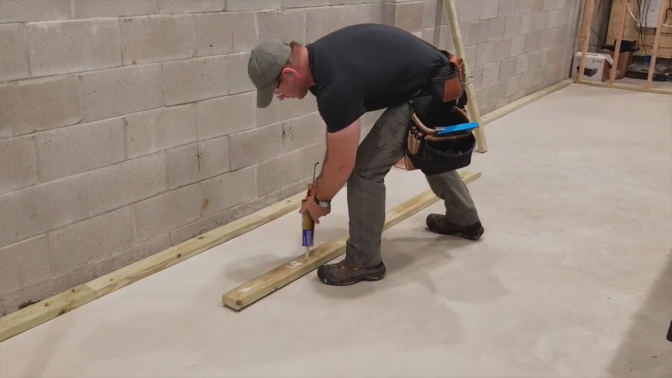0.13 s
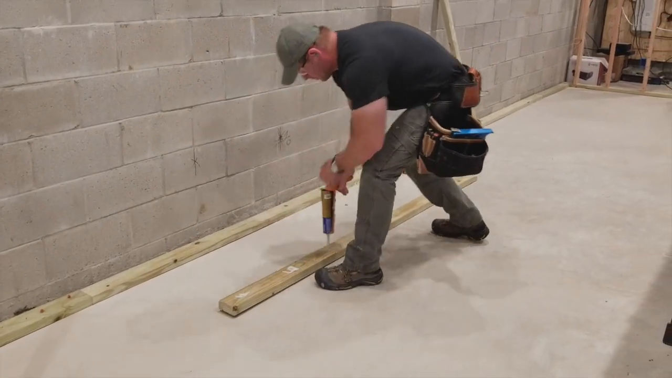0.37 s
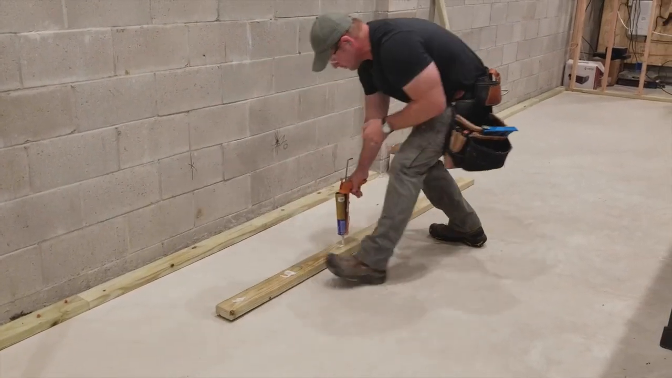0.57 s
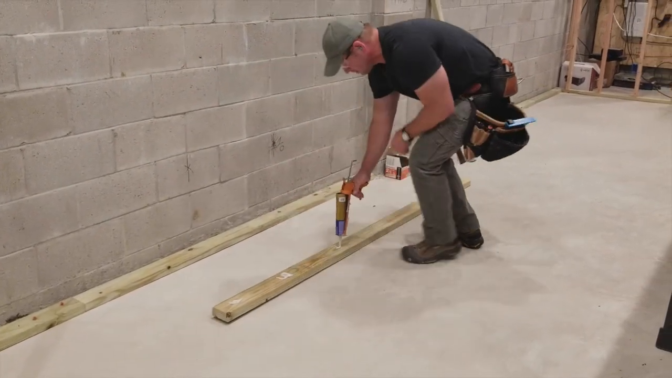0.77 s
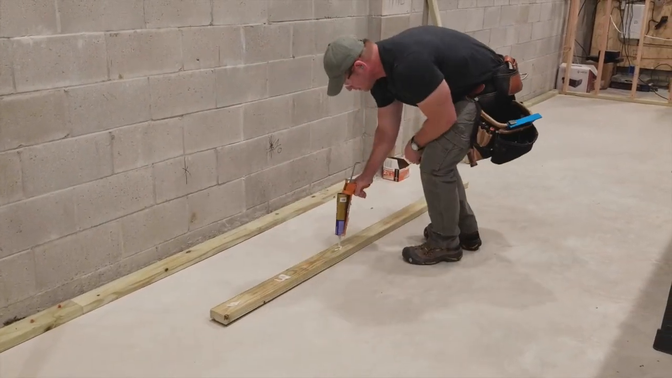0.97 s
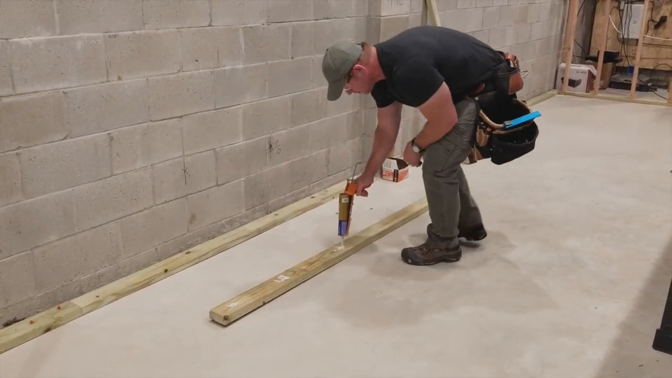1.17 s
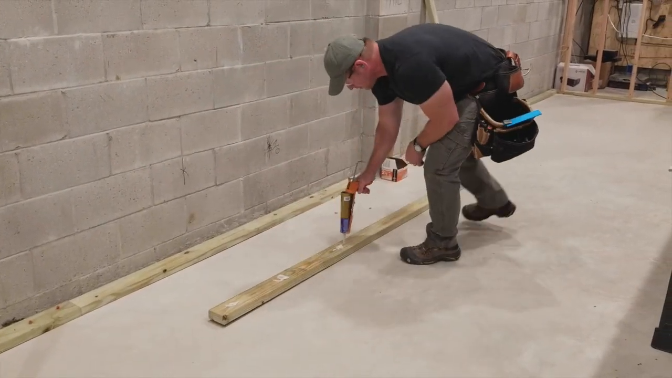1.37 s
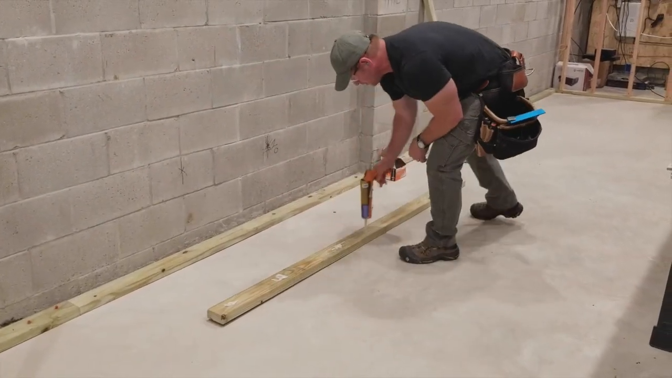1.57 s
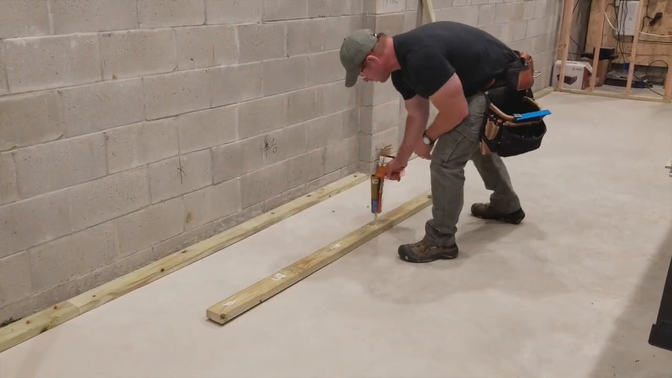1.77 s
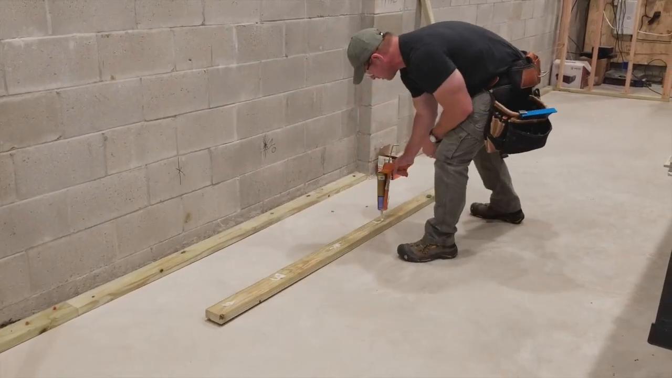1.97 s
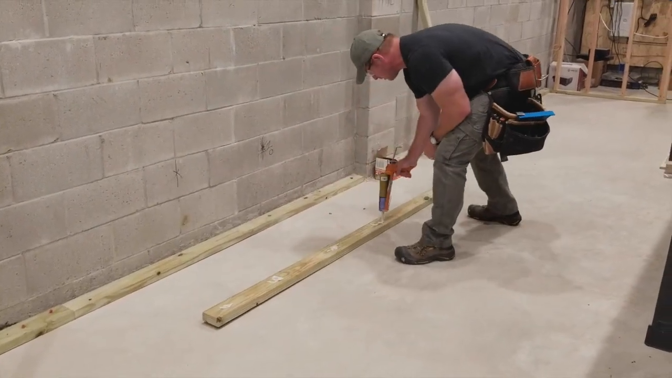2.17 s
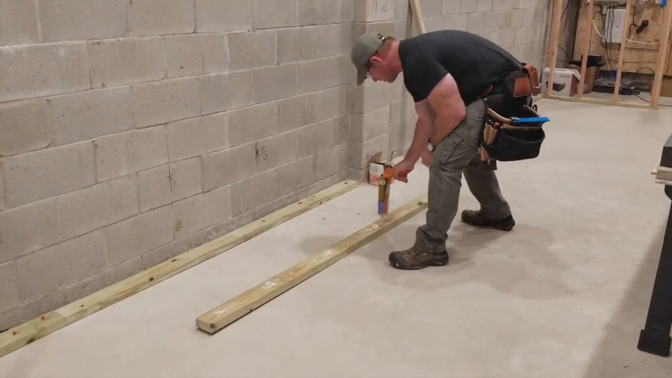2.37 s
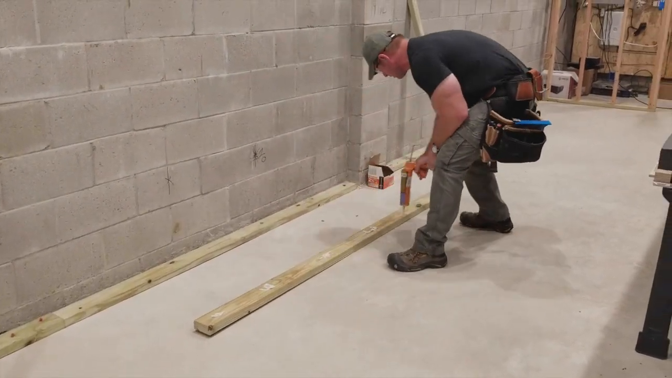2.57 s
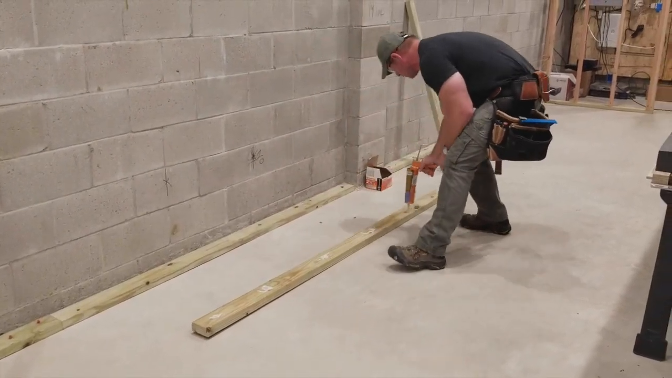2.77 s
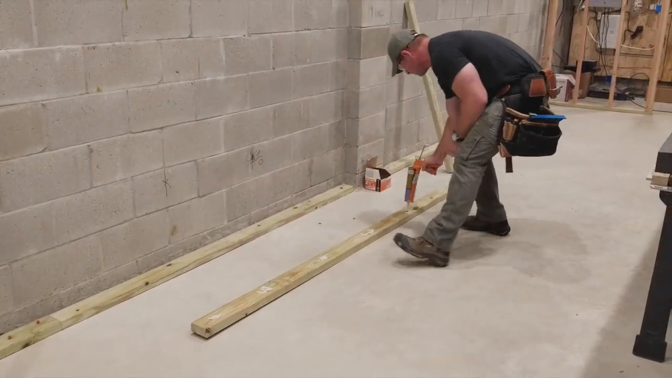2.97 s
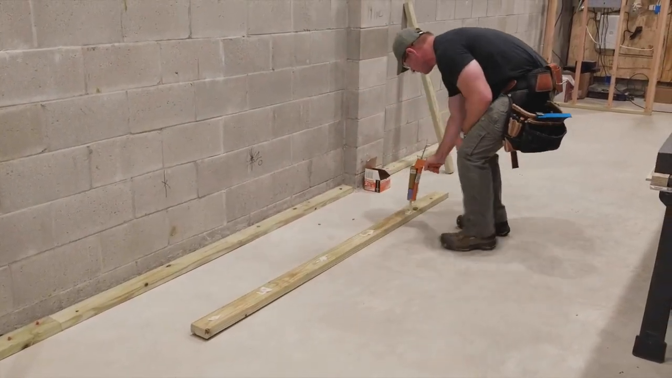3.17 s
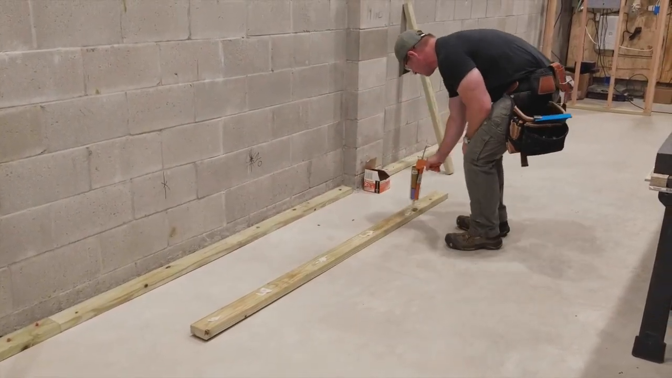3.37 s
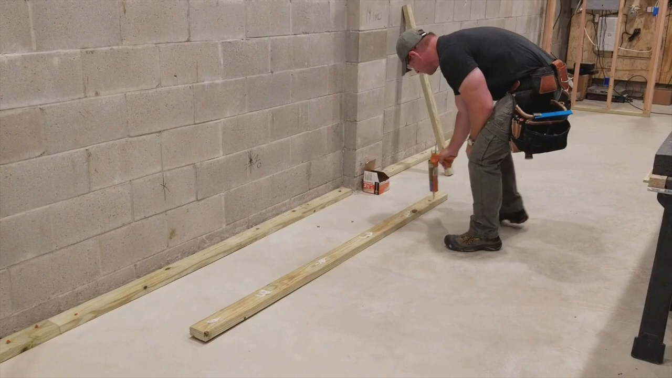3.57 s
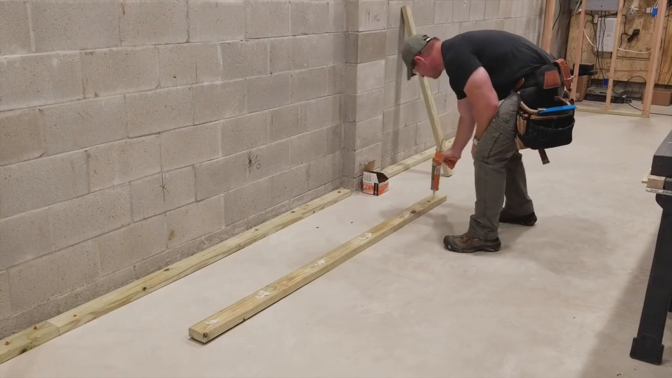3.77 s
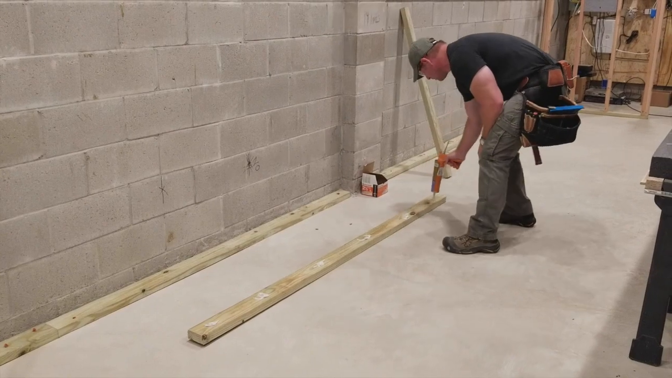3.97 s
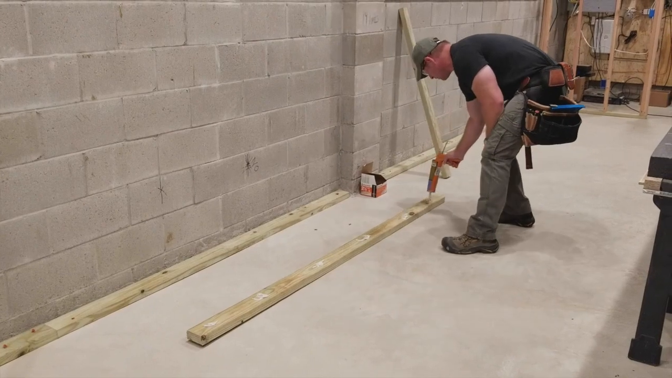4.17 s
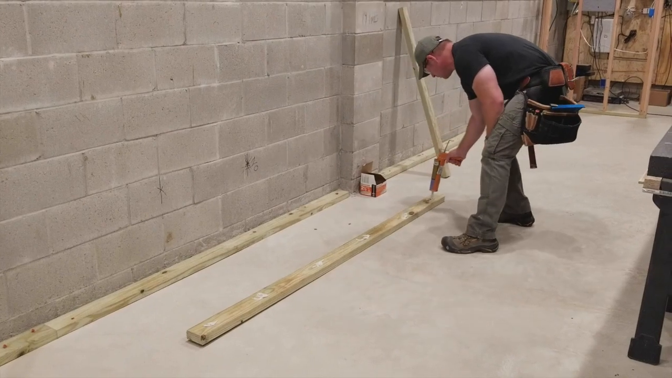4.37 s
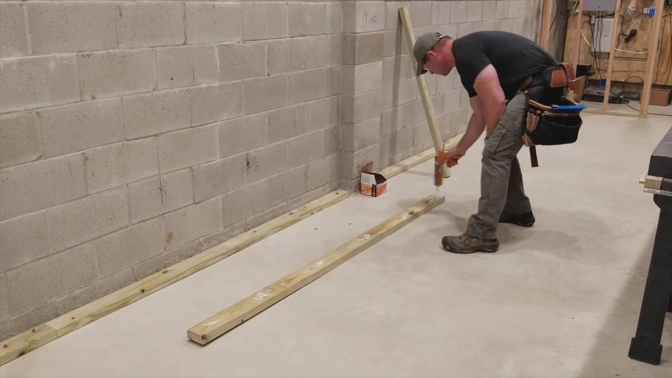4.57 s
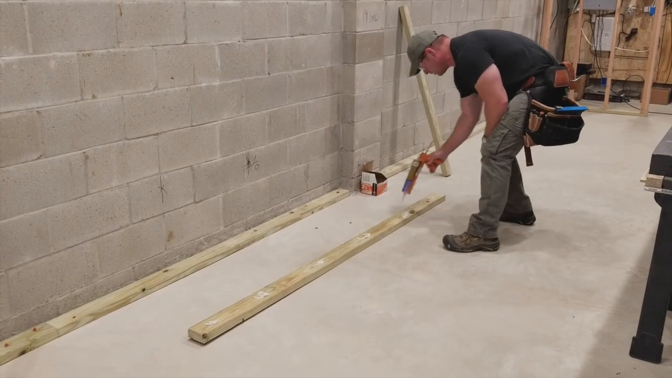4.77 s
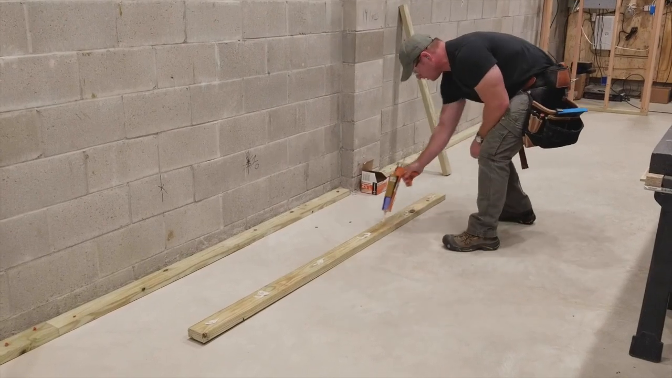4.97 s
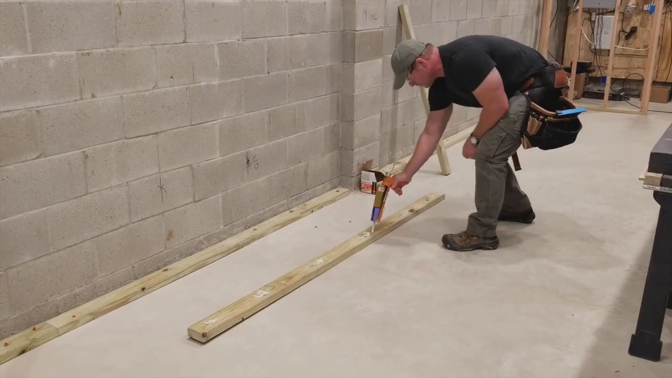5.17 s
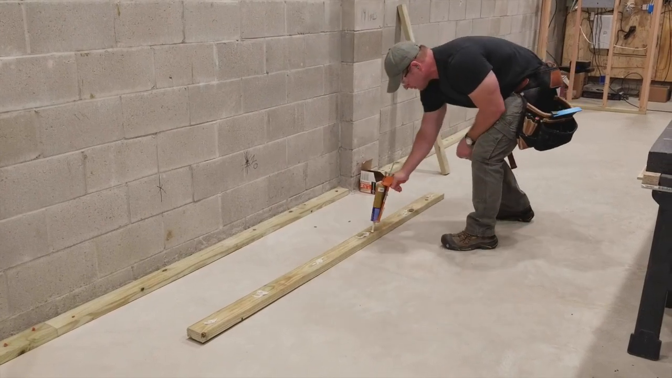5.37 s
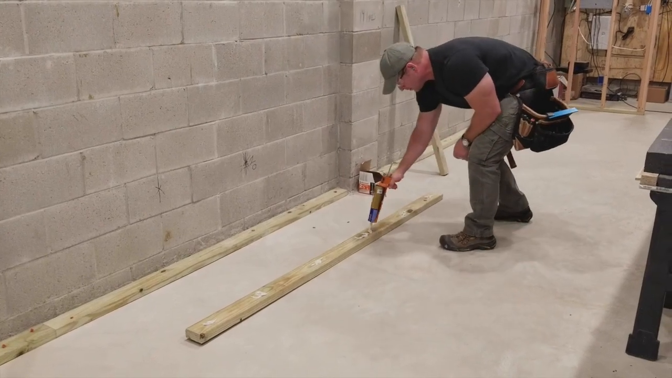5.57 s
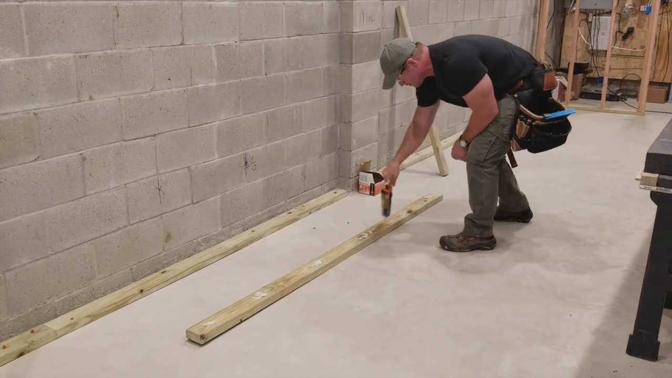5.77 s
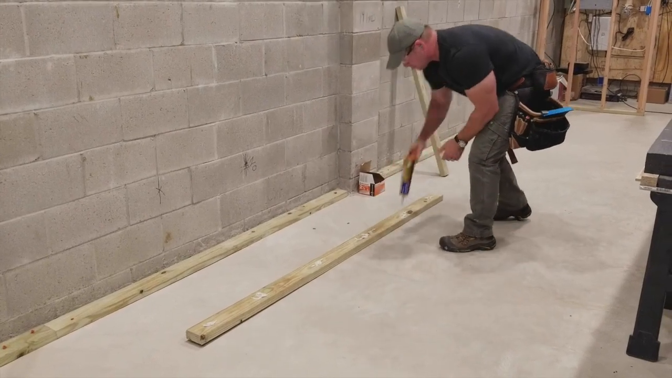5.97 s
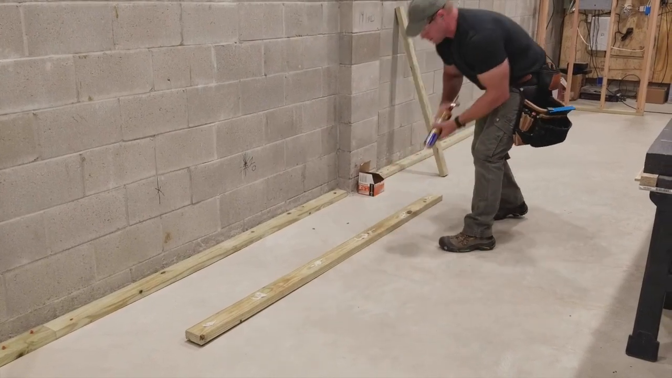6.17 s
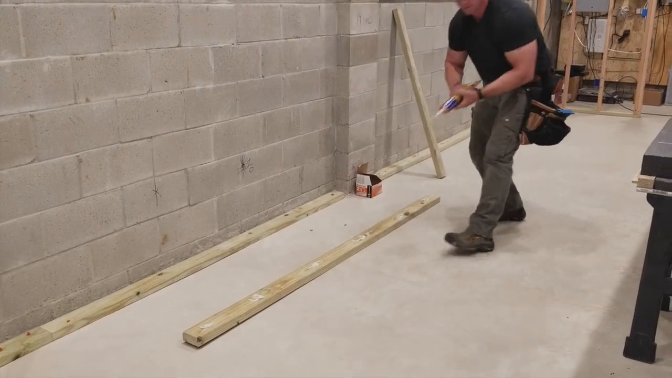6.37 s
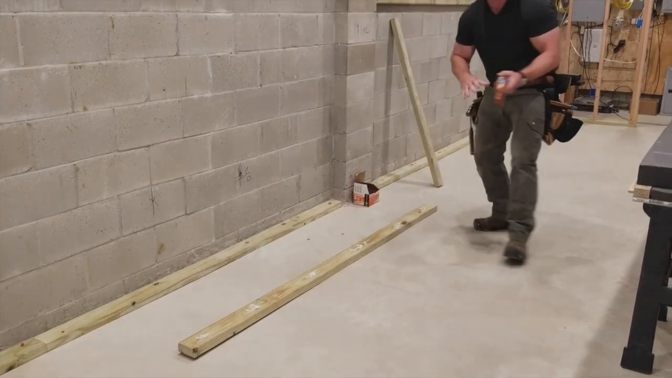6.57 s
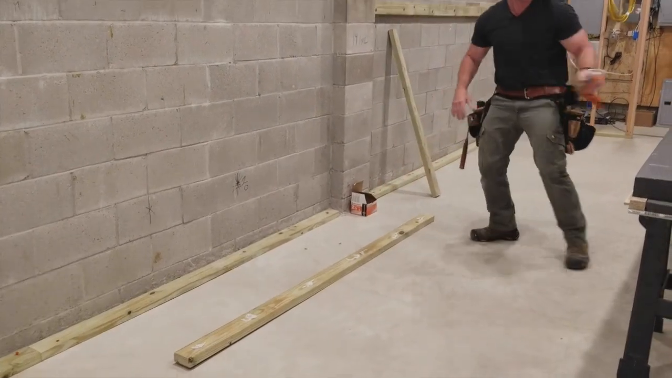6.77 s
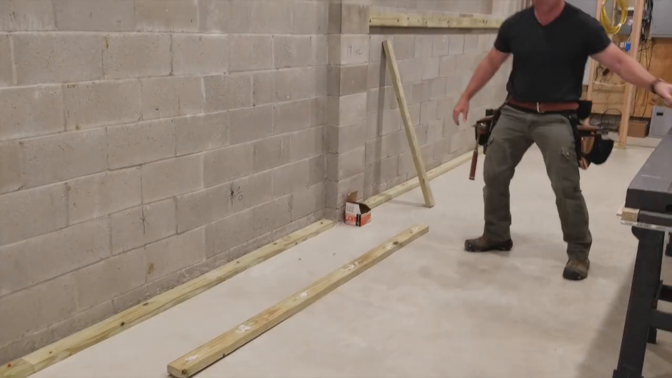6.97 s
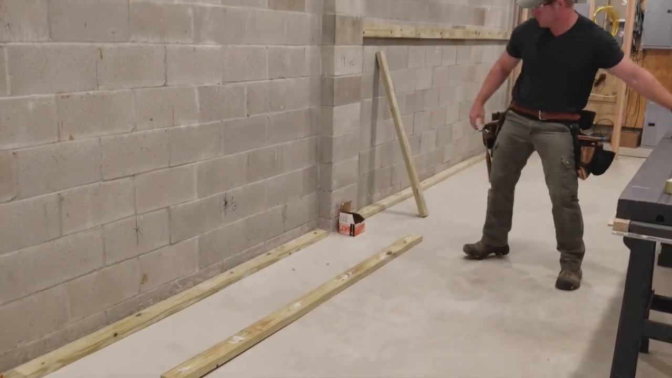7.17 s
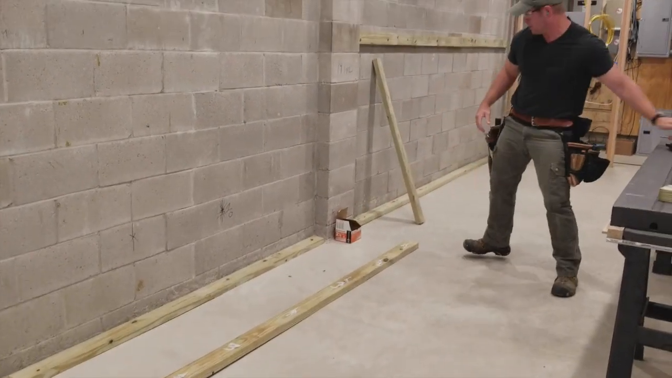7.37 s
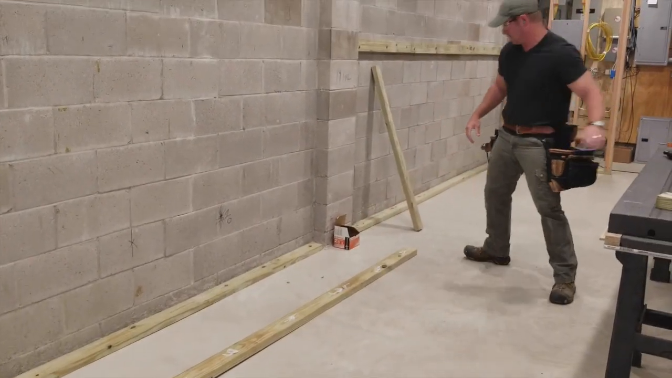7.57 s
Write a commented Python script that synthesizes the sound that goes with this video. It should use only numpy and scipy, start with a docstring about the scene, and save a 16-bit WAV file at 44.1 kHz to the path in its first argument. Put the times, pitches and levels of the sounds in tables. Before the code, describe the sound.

In a hard, echoing basement, a caulking gun bangs and knocks against a board, then boots scuff the concrete. Irregular sharp metal clicks follow, with a louder double snap about once a second, amid soft heel thuds and belt rustle. A rod creaks briefly, the tool clatters, and something heavy lands on a bench with a deep thump. Stereo from a few metres, tool slightly left.

```python
"""A caulking gun clicks along a board in a bare concrete basement, heard in stereo from a few metres.
Over a faint hush, catches and bangs ring the steel frame as bounced ticks, and boards and heels knock as
pushed resonators. Soles then scuff and a boot edge grinds as filtered noise; later come belt rustle, trigger
snaps and creaks of the rod; near the end something heavy lands on a bench.
One wall echo of the tool and noise tails decaying band by band make the hard room."""
import sys
import numpy as np
from scipy import signal
from scipy.fft import rfft, irfft
from scipy.io import wavfile
from scipy.ndimage import uniform_filter1d

SR = 44100
rng = np.random.default_rng(int(sys.argv[2]) if len(sys.argv) > 2 else 0)


def transcribe(signal):
    """Save signal, clipped to [-1, 1], as a 16-bit WAV file at the path in sys.argv[1]."""
    frames = np.atleast_2d(signal).T
    limited = np.clip(frames, -1, 1)
    pcm = np.round(limited * 32767).astype(np.int16)
    wavfile.write(sys.argv[1], SR, pcm)


N = 336483

DETUNE = 0.025  # grip and spot shift each mode by this share (1 sigma) from blow to blow


def undb(db):
    """Decibels to gain."""
    return 10 ** (np.asarray(db) / 20)


def read(table, hz):
    """A (frequency [Hz], value) table read on a log-frequency axis."""
    table_hz, values = np.transpose(table)
    return np.interp(np.log(np.maximum(hz, 1)), np.log(table_hz), values)


def unit(x):
    """Scaled to rms 1."""
    return x / np.sqrt(np.mean(x ** 2))


def add(track, start_s, sound):
    """Mix a sound into the track from start_s."""
    i = int(start_s * SR)
    track[..., i:i + sound.shape[-1]] += sound[..., :N - i]


def walk(rate_hz):
    """Random levels held 1 / rate_hz, slewed by a moving average of that length."""
    hold = int(SR / rate_hz)
    steps = np.repeat(rng.standard_normal(N // hold + 1), hold)
    return uniform_filter1d(steps, hold)[:N]


def coloured(colour, size):
    """Stereo noise of a given spectrum; its channels are alike in the bass, least alike near 1.5 kHz."""
    # likeness of left and right: (frequency [Hz], correlation [0-1])
    likeness = [(150, 0.93), (300, 0.93), (500, 0.8), (800, 0.5), (1500, 0), (16000, 0.3)]
    hz = np.arange(size // 2 + 1) * SR / size
    like = np.clip(read(likeness, hz), 0, 1)
    mid, side = rfft(rng.standard_normal((2, size)))
    pair = np.sqrt(1 + like) * mid + np.sqrt(1 - like) * side * np.array([[1], [-1]])
    return unit(irfft(pair * undb(read(colour, hz)), size))


def hush():
    """The room's faint hush: steady noise with a slowly wavering level."""
    # spectrum: (frequency [Hz], density [dB per Hz])
    hush_colour = [(18, -34), (30, -7.5), (109, -3.5), (261, -18.5), (1150, -20.5), (1660, -20.5),
                   (3300, -30.5), (7470, -24.5), (8990, -32), (15200, -27.5), (16500, -46.5)]
    level_db = -70 + 0.5 * walk(0.78)
    return undb(level_db) * coloured(hush_colour, N)


def rubbing(table, colour, flutter_db, flutter_hz):
    """Friction noise that swells, holds and dies while its grip slips and flutters quickly."""
    depth_db, release_s = 7.5, 0.064
    gain, t = np.zeros(N), np.arange(N) / SR
    for start_s, swell_s, hold_s, level_db in table:
        corners_s = np.cumsum([start_s, swell_s, hold_s, release_s])
        shape = np.interp(t, corners_s, [0, 1, 1, 0])
        # exponential swell from zero; the hold lies 4.8 dB below level_db
        gain += undb(level_db) * (undb(depth_db * shape) - 1) / undb(depth_db)
    flutter = undb(flutter_db * walk(flutter_hz))
    return gain * flutter * coloured(colour, N)


def scuffs():
    """Soles drag over concrete as broad noise; the first faint row is an earlier click dying away."""
    # (start [s], swell [s], hold [s], level before swell depth [dB])
    scuff_times = [(0.0, 0.0011, 0.046, -59.5), (0.575, 0.039, 0.23, -44), (2.9, 0.26, 0.076, -41.5),
                   (6.74, 0.029, 0.23, -63.5), (7.08, 0.024, 0.1, -63.5)]
    # spectrum: (frequency [Hz], density [dB per Hz])
    scuff_colour = [(410, 0), (700, 2), (974, -4), (1890, -0.5), (2840, 1.5), (3420, -2.5), (7460, 1),
                    (9220, -9.5), (13500, 4), (15900, -3), (16500, -42)]
    return rubbing(scuff_times, scuff_colour, flutter_db=2.5, flutter_hz=120)


def grains():
    """Loose grains catch under the sole and lift the friction for a few milliseconds each."""
    rate_per_s, size_db, decay_s = 140, 0.5, 0.0019
    sizes = undb(size_db * np.minimum(rng.exponential(size=N), 2))
    kicks = (rng.random(N) < rate_per_s / SR) * sizes
    return 1 + signal.lfilter([1], [1, -np.exp(-1 / (decay_s * SR))], kicks) / 2


def ring(force, modes, extra_db, scatter_db, detune):
    """A force rings each mode; every blow lands elsewhere and weights the modes anew."""
    out = 0
    draws = rng.standard_normal((len(modes), 2))
    for k, ((hz, width_hz, db), more_db, (weight, shift)) in enumerate(zip(modes, extra_db, draws)):
        b, a = signal.iirpeak(hz * (1 + detune * shift), hz / width_hz, SR)
        sign = -1 if k % 2 and hz > 130 else 1  # neighbours swing against each other, the deepest together
        gain = sign * undb(db + more_db + scatter_db * weight)
        out = out + gain * signal.lfilter(b, a, force)
    return out


def favour(modes, loudest_hz, lift_db):
    """The spot that is struck lifts the modes near one pitch [dB]."""
    octaves = np.log2(np.array(modes)[:, 0] / loudest_hz)
    return lift_db * np.exp(-(octaves / .15) ** 2)


def rattle(size, longest_s, bounce):
    """A tick bounces between loose parts: three allpass echoes spread it and keep its colour even."""
    x = (np.arange(size) == 0) * 1.
    lags = 2 + (longest_s * SR * rng.uniform(.2, 1, size=3)).astype(int)
    for lag in lags:
        a = np.r_[1, np.zeros(lag - 1), -bounce]
        x = signal.lfilter(a[::-1], a, x)
    return x


def from_left(start_s, sound, out):
    """The gun works to the left: louder there, and up to a few samples late on the right."""
    pan_db, max_lag_samples = 1.5, 6  # left over right
    right = np.roll(sound, rng.integers(max_lag_samples + 1))
    gains = undb(np.array([[pan_db], [-pan_db]]) / 2)
    add(out, start_s, gains * np.array([sound, right]))


def catches():
    """Every blow on the frame: squeeze clicks, and touch, blow and rebound of each trigger snap."""
    # light catches of trigger and rod:
    # (time [s], force [dB], frame boom [dB], metal edge [dB], loudest ring [Hz])
    clicks = [(0.108, -32, 1, -39, 2300), (1.0287, -15, -15, 3.5, 2440), (1.1338, -15.5, -8.5, -1, 2300),
              (1.2315, -17, -8.5, -19, 2120), (1.2995, -22.5, -22, -3.5, 1530),
              (1.4537, -23.5, -26, -13, 1570), (1.955, -27, -11, -13, 1750),
              (2.0923, -19.5, -19.5, -6, 2300), (2.1661, -14.5, -21, -7.5, 2220),
              (2.2338, -15, -13, 0, 1684), (2.432, -27, 4.5, -24, 2130), (2.869, -28, -6, -31, 2450),
              (2.9132, -14, -13, -8.5, 1610), (3.2477, -13.5, -10.5, -27, 2710),
              (3.411, -15, -8, -4.5, 1940), (4.0229, -15.5, -18, -19, 2950),
              (4.0655, -20.5, -10.5, -10, 1850), (4.169, -26.5, -12, -14, 1590),
              (4.198, -36, -28, -1, 1750), (4.2457, -12, -26, -4, 1430), (4.3605, -23, -28, -8.5, 2200),
              (4.4765, -19, -11, -44, 1896), (4.6592, -9.5, -42.5, -4.5, 1593),
              (4.8786, -24.5, -32.5, -5.5, 1685), (5.182, -42, 3, -28.5, 1730),
              (5.3928, -28, -9, -25.5, 1740), (5.4801, -15.5, -10, -7, 1980), (5.5458, -53, 12, -9, 1980),
              (5.7226, -25.5, -18.5, -26, 1810), (6.1741, -27, -19, -4.5, 2050)]
    # released trigger snaps home: (first touch [s], full blow after [ms], force [dB],
    # loudest ring [Hz], rebound after [ms], rebound force [dB])
    snaps = [(1.4707, 1.5, -3, 2210, 14, -2.5), (2.4566, 5.63, -0.5, 2690, 25.4, -4),
             (3.477, 3.9, -5, 1603, 17.2, -12.5), (4.5647, 5.5, -8, 1780, 23, -19),
             (5.88, 1.2, -17, 1940, 14.8, -10)]
    touch_db, boom_db = -9, -18.5  # touch relative to full blow
    edge_db, rebound_edge_db, rebound_hz = 1.9, 1, 1740
    rows = list(clicks)
    for touch_s, blow_ms, force_db, loudest_hz, after_ms, rebound_db in snaps:
        rows += [(touch_s, force_db + touch_db, boom_db, edge_db, loudest_hz),
                 (touch_s + blow_ms / 1000, force_db, boom_db, edge_db, loudest_hz),
                 (touch_s + after_ms / 1000, rebound_db, boom_db, rebound_edge_db, rebound_hz)]
    return rows


def frame_clicks():
    """Catches ring the modes of the steel frame; harder ones rattle longer."""
    # frame modes: (frequency [Hz], width [Hz], level [dB])
    frame = [(883, 133, 15.5), (1552, 326, 9.5), (1750, 227, 14), (1885, 200, 12.5), (2450, 355, 12),
             (2950, 110, 9.5), (3046, 490, 0), (4570, 49, 5.5), (5030, 100, 5.5), (6160, 67, -4.5),
             (6370, 360, 9), (5340, 3300, 3), (7600, 360, 8), (7400, 560, 7), (11730, 190, 4),
             (12740, 3500, 1.5), (14730, 520, -1.5)]
    far_db_per_s = -1  # the brightest modes fade as the worker moves off along the wall
    out, hz = np.zeros((2, N)), np.array(frame)[:, 0]
    for start_s, force_db, boom_db, edge_db, loudest_hz in catches():
        tone_db = np.where(hz < 1200, boom_db, 0) + np.where(hz > 4000, edge_db, 0)
        tone_db = tone_db + favour(frame, loudest_hz, lift_db=5.5)
        tone_db = tone_db + np.where(hz > 9000, far_db_per_s * start_s, 0)
        longest_s = np.interp(force_db, [-20, -7], [.0005, .0013])
        force = rattle(SR // 12, longest_s, bounce=.6)
        sound = ring(force, frame, tone_db, scatter_db=2.5, detune=DETUNE)
        from_left(start_s, undb(force_db) * sound, out)
    return out


def blows(table, modes, contact_ms, grit, settle_s, detune):
    """A half-sine push with rough noise that begins with it and dies away; long pushes favour low modes."""
    softer_per_db = 0.16  # contact_ms holds at -20 dB; weaker blows touch longer
    out, t = np.zeros(N), np.arange(SR) / SR
    for start_s, level_db, loudest_hz in table:
        contact_s = contact_ms / 1000 * np.exp(-softer_per_db * (level_db + 20))
        push = np.sin(np.pi * np.minimum(t / contact_s, 1))
        rough = grit * rng.standard_normal(len(t)) * np.exp(-t / settle_s)
        lift_db = favour(modes, loudest_hz, lift_db=5.0)
        sound = ring(push + rough, modes, lift_db, scatter_db=1.5, detune=detune)
        add(out, start_s, undb(level_db) * sound / np.abs(sound).max())
    return out


def knocks():
    """Board, tools and bench top: pushes ring wooden modes; strong ones are short, faint ones long and dull."""
    # knocks: (time [s], peak level [dB], loudest ring [Hz])
    knock_times = [(0.149, -18.5, 850), (0.157, -21.5, 1350), (0.189, -24.5, 595), (0.322, -21, 1280),
                   (0.331, -24, 462), (0.349, -44, 385), (0.667, -34, 302), (0.79, -39.5, 740),
                   (1.375, -50.5, 432), (1.398, -54.5, 426), (2.856, -41.5, 352), (3.17, -43, 570),
                   (3.39, -45, 586), (6.388, -37.5, 400), (6.893, -55.5, 428), (7.131, -60, 428),
                   (7.225, -15.5, 885), (7.256, -24, 410)]
    # wood modes: (frequency [Hz], width [Hz], level [dB])
    wood = [(272, 25, -12.5), (318, 200, 6.5), (434, 82, 10), (597, 48, 4.5), (797, 100, 4), (905, 130, 5),
            (1330, 210, 1), (1750, 100, 7.5), (2300, 160, -7)]
    return blows(knock_times, wood, contact_ms=0.37, grit=0.35, settle_s=0.024, detune=DETUNE)


def heels():
    """Heels thud on the slab: long soft pushes ring its low resonances."""
    # thuds: (time [s], peak level [dB], loudest ring [Hz])
    thuds = [(0.154, -33.5, 125), (0.326, -37.5, 123), (0.658, -45, 159), (1.573, -50.5, 103),
             (1.82, -50.5, 89), (2.212, -55, 93), (2.806, -46, 98), (3.13, -55, 157), (3.866, -51.5, 93),
             (4.035, -42.5, 132), (4.12, -47.5, 130), (4.283, -42, 130), (4.375, -52.5, 126),
             (5.185, -55.5, 107.3), (5.235, -65, 130)]
    # slab and room modes: (frequency [Hz], width [Hz], level [dB])
    boom = [(69.4, 4.3, -16.5), (98, 16, 2.5), (125.9, 7.2, 10), (158, 20, -0.5), (178, 33, -7.5),
            (222.3, 193, -11)]
    return blows(thuds, boom, contact_ms=2.2, grit=0.6, settle_s=0.05, detune=0)


def bangs():
    """The whole tool hits board, hand or bench: all loose parts clatter as one broadband rattle."""
    # bangs: (time [s], force [dB], treble [dB])
    bang_times = [(0.155, 12, -11), (6.314, 2, -17), (6.32, 12, -10.5), (6.499, 9, -13.5),
                  (7.22, 6.5, -7.5), (7.237, 10.5, -0.5), (7.248, 18, -11.5)]
    # clatter spectrum: (frequency [Hz], level [dB])
    clatter = [(400, -17.5), (900, -16.5), (1500, -12.5), (2300, -4.5), (3300, -8), (4600, -1.5),
               (7500, -1), (9300, -16.5), (12500, -2.5), (16000, -15)]
    out, grid_hz = np.zeros((2, N)), np.linspace(0, SR / 2, 257)
    treble_share = np.clip(np.log2(np.maximum(grid_hz, 1) / 2500), 0, 1)  # full above 5 kHz
    for start_s, force_db, treble_db in bang_times:
        colour_db = read(clatter, grid_hz) + treble_db * treble_share
        # doubled dB, as minimum_phase takes the square root of the response
        linear_phase = signal.firwin2(511, grid_hz, undb(2 * colour_db), fs=SR)
        body = signal.minimum_phase(linear_phase)
        force = rattle(SR // 12, longest_s=.0018, bounce=.6)
        from_left(start_s, undb(force_db) * signal.lfilter(body, 1, force), out)
    return out


def gun():
    """All metal of the tool: frame clicks and bangs, with the bass below 400 Hz cut."""
    highpass = signal.butter(2, 400, "high", fs=SR, output="sos")
    return signal.sosfilt(highpass, frame_clicks() + bangs())


def wall_echo(metal):
    """The block wall throws the tool's sound back once."""
    delay_ms, level_db = 8.6, -6
    return undb(level_db) * np.roll(metal, int(delay_ms / 1000 * SR), axis=1)


def grinds():
    """A boot edge grinds over the slab: mid-pitched, more fluttering friction, strongest near 2.6 kHz."""
    # grinds: (start [s], swell [s], hold [s], level before swell depth [dB])
    grind_times = [(0.735, 0.014, 0.045, -47), (3.03, 0.14, 0.06, -54.5)]
    # spectrum: (frequency [Hz], density [dB per Hz])
    grind_colour = [(1000, -28), (1800, -5), (2600, 6.5), (4000, -1), (7500, -5.5), (10000, -26.5)]
    return rubbing(grind_times, grind_colour, flutter_db=4.0, flutter_hz=120)


def rustles():
    """Boots and tool belt shift: dull fluttering friction."""
    # rustles: (start [s], swell [s], hold [s], level before swell depth [dB])
    rustle_times = [(1.03, 0.013, 0.06, -59.5), (1.3, 0.18, 0.11, -61), (2.8, 0.014, 0.12, -62),
                    (3.1, 0.034, 0.52, -64), (3.75, 0.038, 0.3, -68), (5.175, 0.0069, 0.022, -66),
                    (6.75, 0.11, 0.032, -59), (7.1, 0.032, 0.023, -62)]
    # spectrum: (frequency [Hz], density [dB per Hz])
    rustle_colour = [(150, 0.5), (300, 2.5), (450, 4), (700, 2), (1300, -37.5)]
    return rubbing(rustle_times, rustle_colour, flutter_db=5.0, flutter_hz=60)


def creaks():
    """The rod creaks through its grip plate: narrow-band friction with a strong flutter."""
    # creaks: (start [s], swell [s], hold [s], level before swell depth [dB])
    creak_times = [(5.175, 0.0082, 0.017, -64.5), (5.66, 0.042, 0.017, -48.5)]
    # spectrum: (frequency [Hz], density [dB per Hz])
    creak_colour = [(1300, -27.5), (1600, -11.5), (1900, 13), (2100, 0.5), (2500, -6), (3200, -57.5)]
    return rubbing(creak_times, creak_colour, flutter_db=7.0, flutter_hz=150)


def bench_thump():
    """Something heavy lands: two strong, brief pushes ring the bench and lowest standing waves."""
    # jolts: (time [s], peak level [dB], loudest ring [Hz])
    jolts = [(7.225, -8.5, 178), (7.251, -8, 117)]
    # bench and standing-wave modes: (frequency [Hz], width [Hz], level [dB])
    bench = [(63, 2.2, 10), (106.5, 12, 8), (106.3, 2.3, 6.5), (117, 6.6, 11.5), (138, 16, 3),
             (178, 13.2, 6.5), (243, 11, 1.5), (267, 4.1, 0.5)]
    return blows(jolts, bench, contact_ms=8.4, grit=0.1, settle_s=0.015, detune=0)


def reflections():
    """Dense reflections from one spot build up quickly and die band by band."""
    # decay: (frequency [Hz], time to fall 60 dB [s])
    room_t60 = [(60, 0.7), (200, 0.8), (600, 0.85), (1500, 0.61), (4000, 0.58), (9000, 0.5), (15000, 0.37)]
    # band gain: (frequency [Hz], level [dB])
    room_level = [(60, -6.5), (180, 0), (400, 5.5), (1500, 6), (5000, 0.5), (16000, -1)]
    rise_s, early_db, early_s = 0.005, 5, 0.031  # near wall and slab strengthen the early part
    t, hz = np.arange(SR) / SR, np.maximum(np.arange(SR // 2 + 1), 1)
    noise, tail = rfft(coloured([(20, 0), (20000, 0)], SR)), 0
    for centre_hz in 40 * 2 ** np.arange(0, 9, .5):
        octaves = np.clip(np.log2(hz / centre_hz), -.5, .5)
        band = np.cos(np.pi * octaves) ** 2
        t60_s = read(room_t60, centre_hz)
        evening = np.sqrt(2 * np.log(1000) / (SR * t60_s))  # equal energy for any decay time
        decay = np.exp(-np.log(1000) * t / t60_s) * evening
        tail = tail + undb(read(room_level, centre_hz)) * irfft(noise * band, SR) * decay
    return tail * (1 - np.exp(-t / rise_s)) * undb(early_db * np.exp(-t / early_s))


def room(dry):
    """The worker moves to a new spot each stride; every spot has its own reflections."""
    stride_s = 1.0
    out, step = np.zeros((2, N)), int(stride_s * SR)
    for i in range(0, N, step):
        add(out, i / SR, signal.fftconvolve(dry[:, i:i + step], reflections(), axes=1))
    return out


def scene():
    """All sources in the room, over its hush."""
    soles = grains() * (scuffs() + grinds())
    metal = gun()
    thump = bench_thump()
    direct = metal + knocks() + heels() + soles + rustles() + creaks()
    to_room = direct + undb(-4) * thump  # the room answers the thump more weakly
    return direct + wall_echo(metal) + thump + room(to_room) + hush()


def record(dry):
    """The microphones cut the deep bass and the top."""
    low_cut_hz, top_hz = 50, 16500
    lean = signal.sosfilt(signal.butter(3, low_cut_hz, "high", fs=SR, output="sos"), dry)
    return signal.sosfilt(signal.ellip(10, .2, 70, top_hz, fs=SR, output="sos"), lean)


dry = scene()
out = record(dry)
transcribe(out)
```